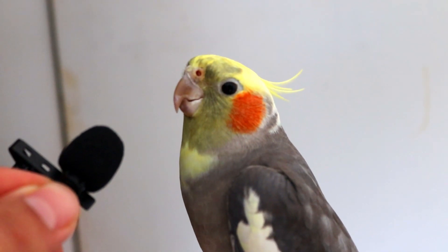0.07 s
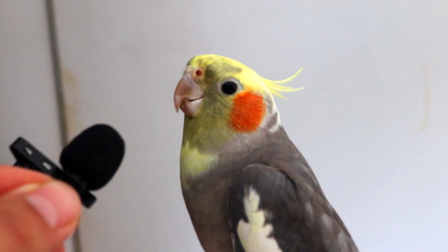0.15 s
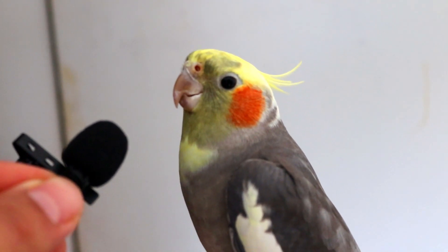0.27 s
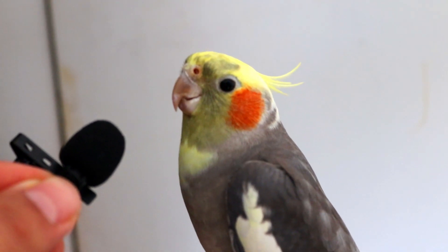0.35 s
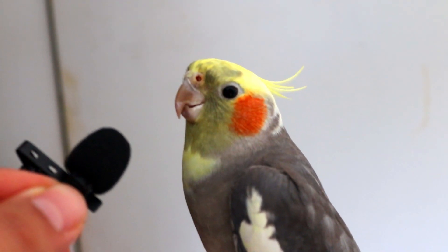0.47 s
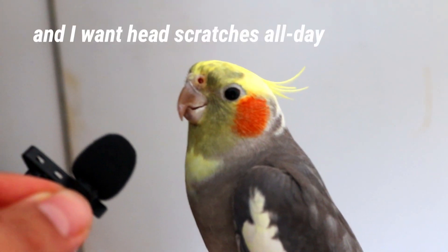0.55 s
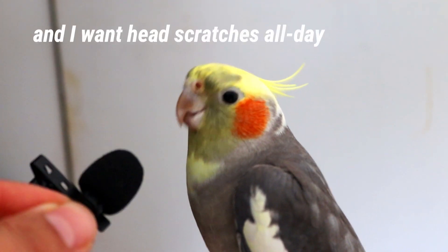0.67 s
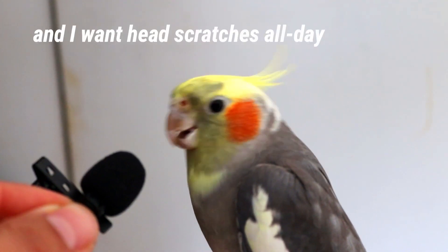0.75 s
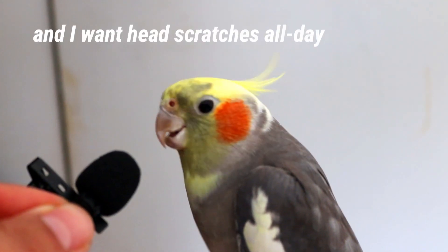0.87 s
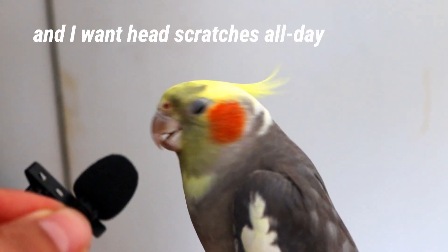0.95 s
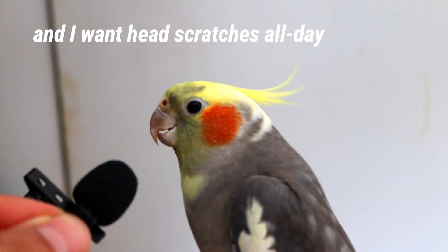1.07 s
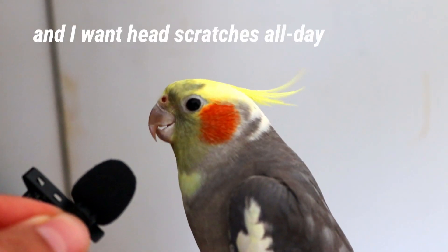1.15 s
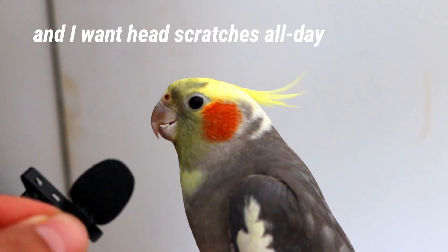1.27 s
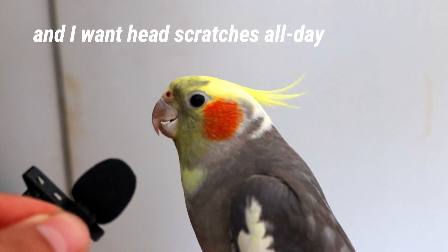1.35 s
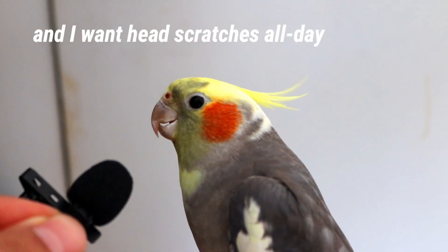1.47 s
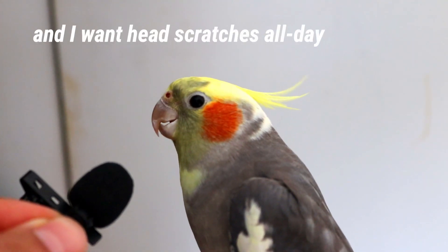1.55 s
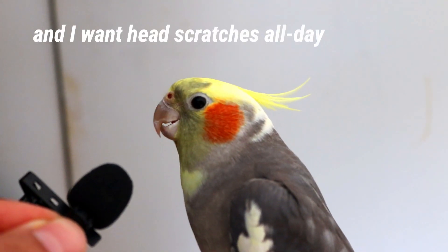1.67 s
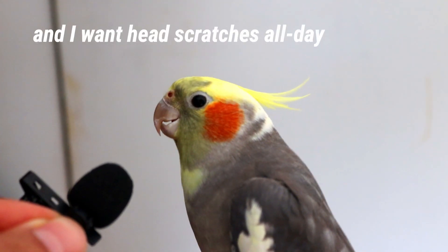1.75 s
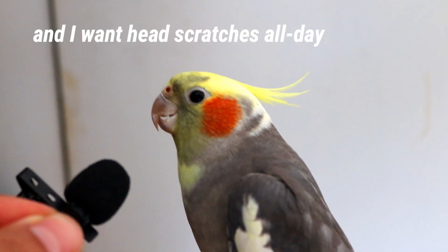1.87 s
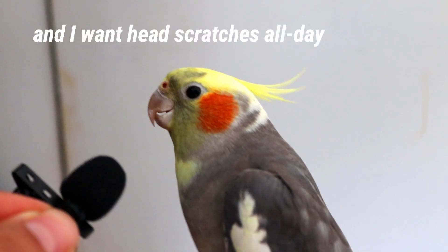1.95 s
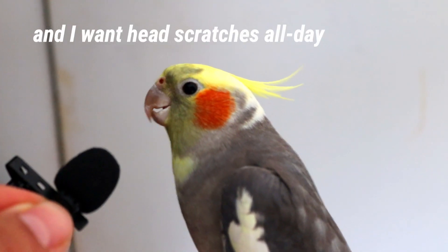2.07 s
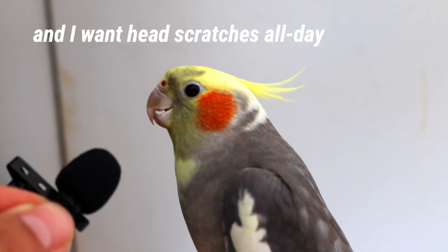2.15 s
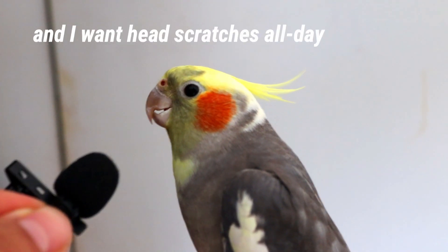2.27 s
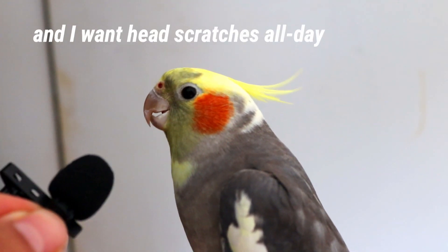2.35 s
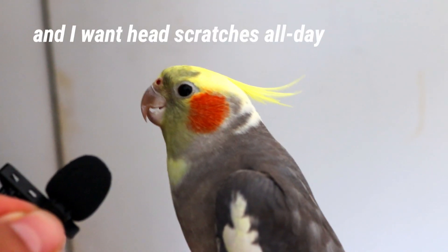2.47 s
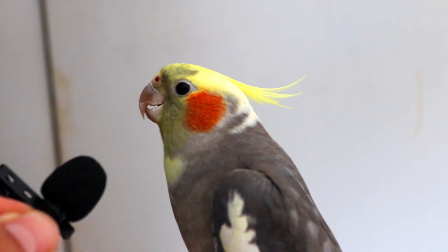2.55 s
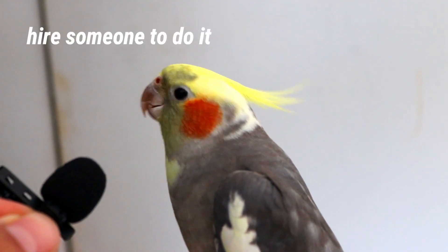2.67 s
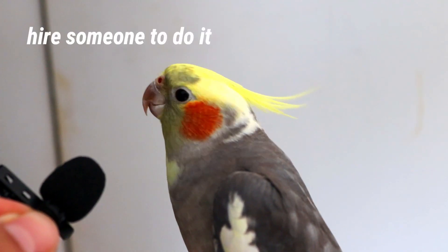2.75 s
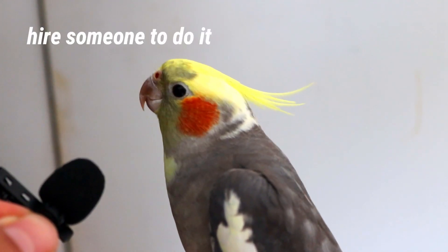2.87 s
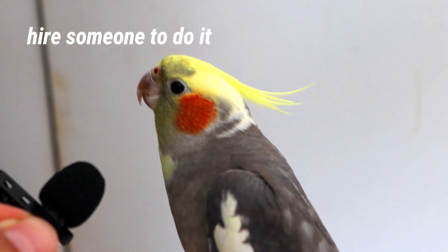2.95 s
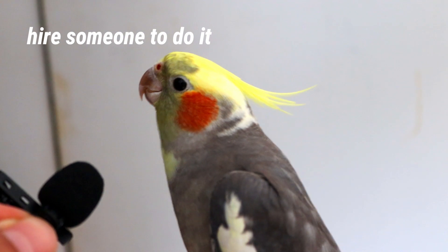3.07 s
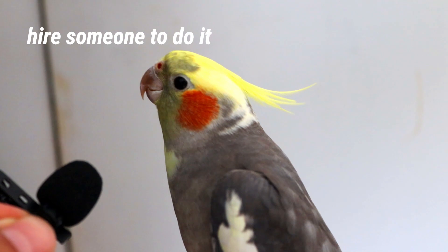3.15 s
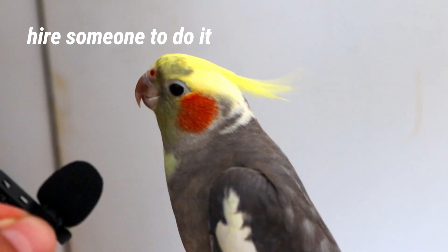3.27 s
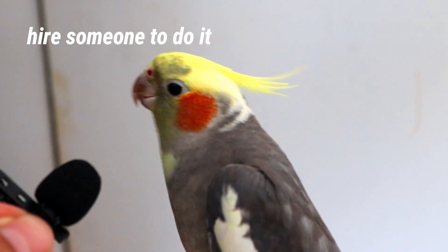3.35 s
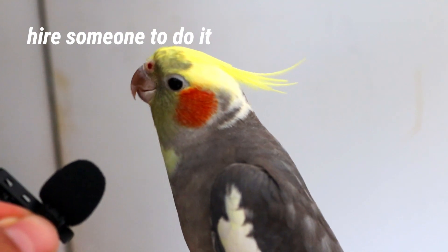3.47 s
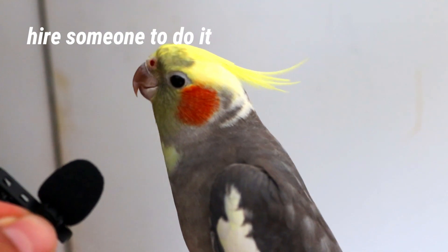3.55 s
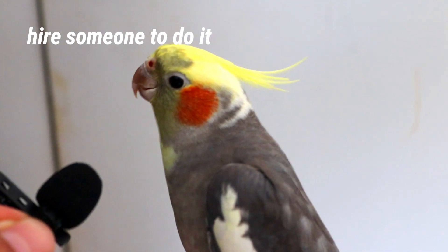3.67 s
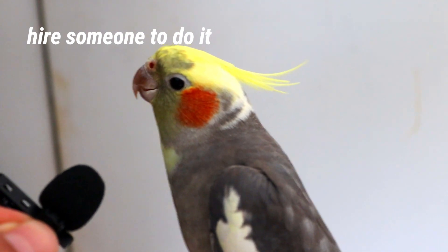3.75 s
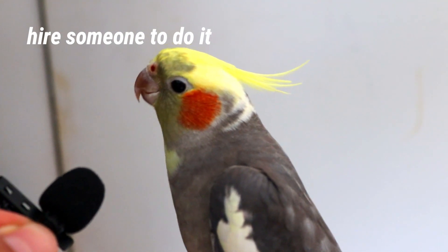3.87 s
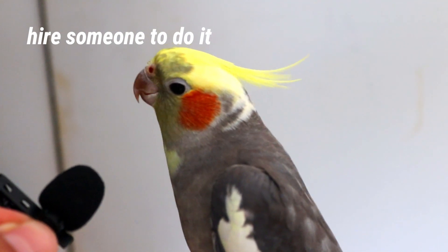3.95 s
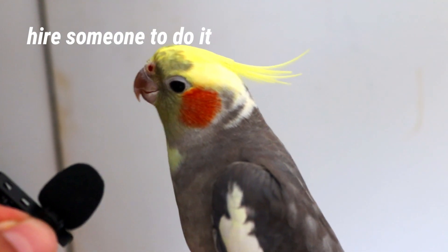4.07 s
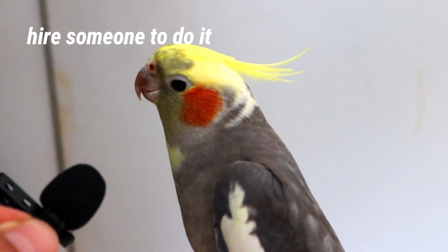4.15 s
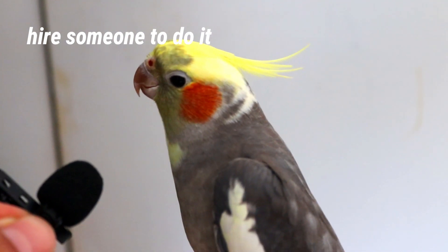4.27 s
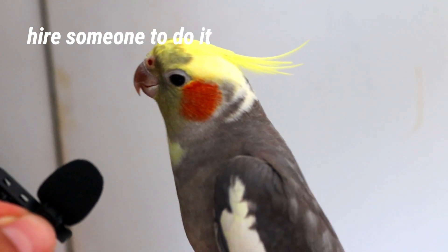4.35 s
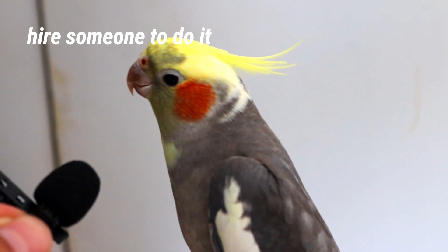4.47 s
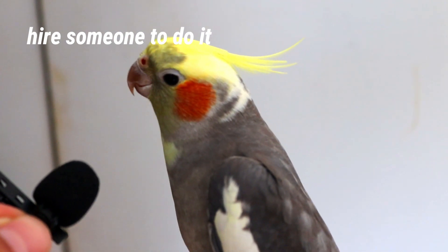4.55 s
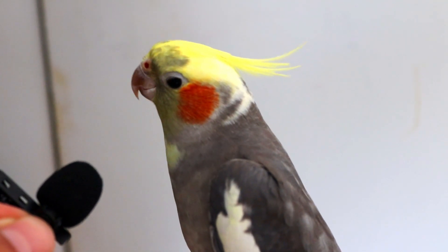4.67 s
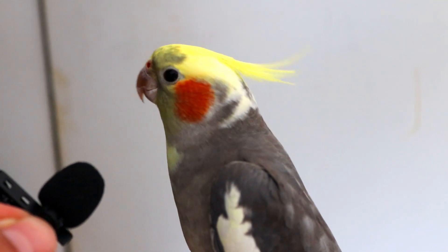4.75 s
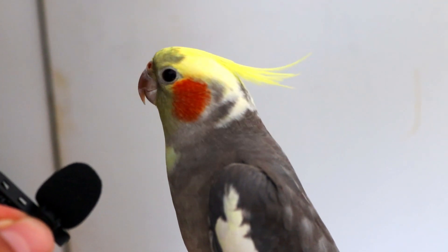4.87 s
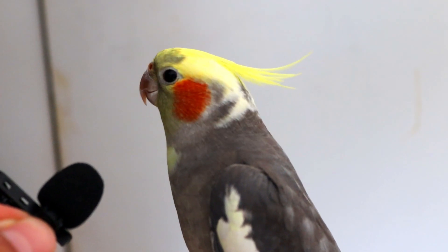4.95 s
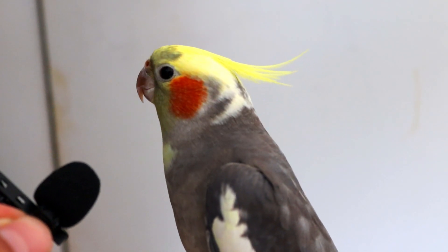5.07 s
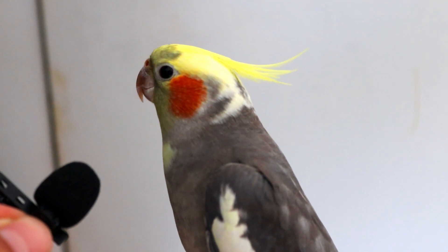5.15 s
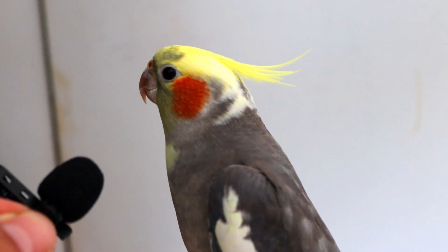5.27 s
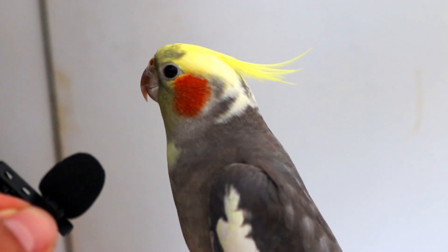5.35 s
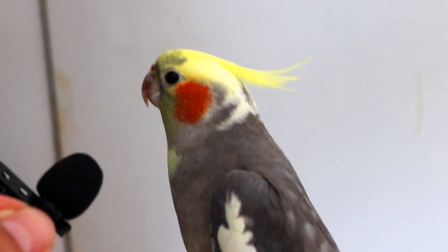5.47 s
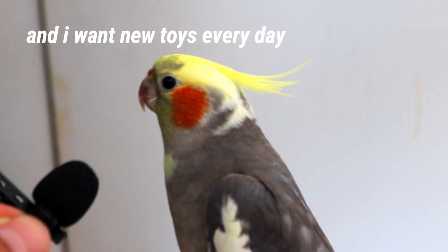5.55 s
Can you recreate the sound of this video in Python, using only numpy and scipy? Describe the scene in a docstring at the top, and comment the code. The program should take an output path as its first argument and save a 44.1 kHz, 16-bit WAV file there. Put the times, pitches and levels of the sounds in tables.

```python
"""A cockatiel sings short whistled notes close to the microphone: harmonics of the syrinx through a throat and beak.
Most notes open with a few clicks and a crackle (pulses ringing throat resonances).
Each note starts rough, locks into a clean whistle and breaks up as it ends.
Farther birds chirp (bent glides) and rasp (shaped noise) in the same echoing room.
Air hiss, rumble and soft bumps are shaped noise; a gain control evens out the loud notes."""
import sys
import numpy as np
from scipy import signal
from scipy.fft import rfft, irfft, next_fast_len
from scipy.io import wavfile
from scipy.ndimage import uniform_filter1d

SR = 44100
rng = np.random.default_rng(int(sys.argv[2]) if len(sys.argv) > 2 else 0)


def master(y):
    """Save y as 16-bit WAV."""
    cut = np.clip(np.atleast_2d(y).T, -1, 1)
    pcm = np.round(cut * 32767)  # scale
    wavfile.write(sys.argv[1], SR, pcm.astype(np.int16))


N = 247401
TIME_S = np.arange(N) / SR
CUTOFF_HZ = 15900

# Near notes; pitch is the syrinx fundamental, its 2nd harmonic is the whistle heard. Levels are before mixing:
# first_snap_s, voice_start_s, end_s, rough_opening_s, lock_pitch_hz, turn_pitch_hz, breakup_pitch_hz,
# turn_place_0_1, whistle_level_db, beak_opening_0_1, odd_harmonics_db, octave_above_whistle_db,
# top_harmonics_db, snap_level_db
NOTES = [(-0.03, -0.02, 0.079, 0.01, 741.0, 755.0, 752.0, 0.8, -14.0, 0.37, 1.0, 2.5, -2.5, -10.0),
         (0.8903, 0.92, 1.024, 0.01, 796.0, 829.0, 818.0, 0.45, -15.0, 0.42, 1.0, 9.0, -1.0, -0.5),
         (1.0762, 1.099, 1.198, 0.024, 795.0, 793.0, 768.0, 0.65, -14.5, 0.6, 1.0, 8.0, -2.0, -2.0),
         (1.2503, 1.275, 1.378, 0.008, 805.0, 794.0, 807.0, 0.7, -13.5, 0.57, 0.5, 10.0, 0.0, -4.5),
         (1.4328, 1.455, 1.56, 0.013, 783.0, 775.0, 774.0, 0.5, -15.0, 0.62, -0.5, 4.5, 3.0, -7.0),
         (1.6143, 1.641, 1.723, 0.011, 885.0, 849.0, 865.0, 0.55, -12.5, 0.95, -3.0, -5.0, 4.0, -5.5),
         (1.7857, 1.81, 1.903, 0.012, 826.0, 785.0, 830.0, 0.35, -14.0, 0.72, -3.5, 5.5, -1.0, -6.0),
         (1.9841, 1.995, 2.103, 0.031, 858.0, 834.0, 863.0, 0.3, -13.5, 0.8, -3.5, 5.0, -3.0, -7.0),
         (2.1555, 2.184, 2.281, 0.01, 872.0, 880.0, 882.0, 0.6, -12.5, 0.9, -2.0, -2.5, 1.5, -4.0),
         (2.3472, 2.372, 2.46, 0.012, 856.0, 870.0, 858.0, 0.2, -14.0, 0.78, -0.0, 5.0, 2.0, -4.5),
         (2.5421, 2.551, 2.794, 0.033, 829.0, 871.0, 802.0, 0.6, -14.0, 0.73, -4.0, 2.0, -3.0, -8.0),
         (3.0612, 3.086, 3.245, 0.01, 789.0, 823.0, 811.0, 0.25, -15.5, 0.29, 1.0, 4.5, -0.5, -5.0),
         (3.488, 3.514, 3.753, 0.012, 768.0, 774.0, 722.0, 0.35, -15.0, 0.2, -2.5, -2.0, -2.5, -5.5),
         (3.8127, 3.836, 3.971, 0.022, 742.0, 706.0, 685.0, 0.8, -16.5, 0.13, -1.0, -4.0, 1.0, -14.0),
         (4.0457, 4.064, 4.184, 0.034, 733.0, 715.0, 719.0, 0.35, -16.0, 0.14, -1.5, -3.5, 5.0, -13.0),
         (4.2663, 4.277, 4.416, 0.026, 695.0, 726.0, 744.0, 0.45, -16.5, 0.12, -0.5, -5.0, 6.5, -20.0),
         (4.5049, 4.516, 4.69, 0.04, 743.0, 729.0, 707.0, 0.8, -17.5, 0.42, -2.0, 4.5, 2.0, -12.0)]
# Uneven strength of the syrinx harmonics: harmonic_number, level_db
SYRINX_HARMONICS = [(5, 2), (6, 2.5), (7, 7), (8, -1.5), (9, 1.5), (10, 4), (11, -0.5)]
# Throat colour, beak nearly shut: frequency_hz, level_db
BEAK_SHUT_COLOUR = [(750, -16), (1400, 4), (1650, 3), (2300, -2.5), (3050, -8), (3750, -37), (4500, -24),
                    (5400, -42), (7500, -40.5), (9200, -53.5), (12300, -42.5), (14600, -31)]
# Throat colour, beak wide open: frequency_hz, level_db
BEAK_OPEN_COLOUR = [(850, -25), (1500, -1.5), (1800, -1), (2600, -9.5), (3450, -14), (4300, -16.5),
                    (5200, -7.5), (6100, -15), (7000, -20), (8600, -29.5), (11600, -39), (15000, -50)]
# Throat resonances rung by a snap: frequency_hz, width_hz, level_db
THROAT_RESONANCES = [(1762, 166, 0), (2960, 230, -7), (4120, 415, -0.5), (6330, 1700, 2), (7800, 370, -9),
                     (12100, 1500, -0.5)]
# Chirps of other birds, levels before mixing:
# start_s, end_s, start_pitch_hz, middle_pitch_hz, end_pitch_hz, level_db, second_harmonic_db, roughness_0_1
FAR_CALLS = [ (0.573, 0.626, 1196, 1199, 1195, -41, -5, 0.31),
             (0.619, 0.717, 1694, 1662, 1586, -41, -21, 0.27),
             (0.78, 0.833, 4330, 4000, 3500, -41, -17.5, 0.76),
             (0.818, .89, 2890, 2710, 2530, -30.5, -31, 0.48),
             (1.31, 1.435, 6120, 6550, 5910, -27.5, -19, 0.22),
             (1.334, 1.424, 5300, 5150, 5170, -34.5, -3, 0.19),
             (1.532, 1.626, 1382, 1309, 1317, -36, 11, 0),
             (2.414, 2.587, 4350, 4200, 4447, -29, -6.5, 0.48),
             (2.975, 3.016, 7200, 7150, 7170, -50, -17, .15), (2.47, 2.557, 6500, 6500, 6395, -42, 6, 0.58),
             (4.423, 4.523, 3600, 3500, 3500, -46, -12, 0.7),
             (4.636, 4.721, 6180, 7150, 7080, -14.5, -14, 0.36),
             (4.704, 4.766, 5970, 5950, 5960, -21.5, -9.5, 0.32),
             (4.682, 4.852, 1896, 2749, 2320, -22, -19, 0.58), (4.71, 4.8, 2802, 2840, 2857, -15, -20, 0),
             (5.163, 5.295, 1110, 1300, 1702, -44, -18, 0.37),
             (5.449, 5.585, 1162, 1250, 1470, -42, -5.5, 0.63)]
# Far hisses and harsh rasps, levels before mixing: start_s, end_s, level_db, treble_tilt_db_per_octave
RASPS = [(0.267, 0.338, -41.5, 5.5), (2.416, 2.6, -27.5, 10), (4.845, 4.935, -18.5, 5.5),
         (5.424, 5.498, -40.5, -5)]
# Rasp spectrum before the tilt: frequency_hz, level_db
RASP_COLOUR = [(800, -21.5), (1600, -4), (2700, 7), (3600, -6), (4400, -0.5), (6300, -1), (7500, -14.5),
               (9000, -14.5), (13000, -31.5), (16000, -41)]
# Soft bumps of the hand on the microphone: centre_s, level_db
BUMPS = [(0.568, -50), (.674, -44.5), (2.585, -48), (3.016, -47)]
# Bump spectrum: frequency_hz, level_db
BUMP_COLOUR = [(40, -30), (110, -10), (200, -6), (330, -8), (600, -27), (2000, -42)]
# Level of the low room rumble: time_s, level_db
RUMBLE_LEVEL = [(0, -59), (1.2, -57), (2.3, -66), (2.7, -57.5), (3.6, -59), (4.55, -58.5), (4.7, -53.5),
                (5.1, -55.5), (5.35, -64), (5.6, -58)]
# Rumble spectrum: frequency_hz, level_db
RUMBLE_COLOUR = [(20, -23), (36, -18), (49, -4.5), (70, -9), (120, -15.5), (300, -24.5), (1000, -51.5)]
# Room hiss spectrum: frequency_hz, level_db
AIR_COLOUR = [(60, -19.5), (220, 0), (500, -0.5), (1500, -7), (3000, -19.5), (7000, -10.5), (16000, -16)]
# Room echo bands: centre_hz, t60_s, level_db
ROOM_BANDS = [(286, 0.9, 0.5), (860, 1, -2.5), (1970, 0.79, 1), (3500, 0.61, 0), (6400, 0.47, -1),
              (14100, .3, -9)]

ATTACK_S, RELEASE_S = 0.0045, 0.019
# The voice locks and breaks up abruptly
LOCK_S, ROUGH_ENDING_S, BREAK_S, ENDING_ROUGHNESS = 0.0033, 0.01795, 0.0035, 0.81
# A note starts sharp and settles, sags as it breaks up, and flicks upwards in its last instant
SETTLE_HZ_PER_S, SAG_HZ_PER_S, FLICK_S, FLICK_HZ_PER_S = 1062, 1800, 0.0062, 3500
# Odd harmonics fade through the note, with a very slight bulge midway; the octave fades; the top grows
ODD_FADE_DB, ODD_ARCH_DB, OCTAVE_FADE_DB, TOP_RISE_DB = 7.5, 0.5, 2.7, 7
# A held note strains: grittier, recoloured, trembling
CLEAN_ROUGHNESS, HELD_ROUGHNESS, STRAIN_AFTER_S, STRAIN_RISE_S = 0.02, 0.078, 0.059, 0.014
STRAIN_OCTAVE_DB, STRAIN_ODD_DB, STRAIN_PITCH_FRACTION = 2, 3.5, 0.0065


def from_db(db):
    """Decibels to gain."""
    return 10 ** (np.asarray(db) / 20)


def rms_one(x):
    """Scale to rms 1."""
    return x / np.sqrt(np.mean(x ** 2) + 1e-20)


def at_hz(points, hz):
    """Read a spectrum on a log-frequency axis."""
    point_hz, value = np.transpose(points)
    return np.interp(np.log(np.maximum(hz, 1)), np.log(point_hz), value)


def ramp(start, end, at=TIME_S):
    """0 before start, 1 after end, straight between."""
    return np.clip((at - start) / max(end - start, 1 / SR), 0, 1)


def filtered(x, order, hz, kind="low"):
    """Butterworth filter."""
    return signal.sosfilt(signal.butter(order, hz, kind, fs=SR, output="sos"), x)


def wobble(rate_hz):
    """Random motion up to about a given rate, rms 1."""
    return rms_one(filtered(rng.standard_normal(N), 2, rate_hz))


def noise(colour):
    """Noise of a given spectrum, rms 1."""
    size = next_fast_len(N)
    gain = from_db(at_hz(colour, np.fft.rfftfreq(size, 1 / SR)))
    return rms_one(irfft(rfft(rng.standard_normal(size)) * gain, size)[:N])


def note_course(t, start_s, end_s, opening_s, lock_hz, turn_hz, breakup_hz, turn):
    """Course of one note: rough until it locks, two clean glides, rough again as the pressure drops."""
    lock_s, break_s = start_s + opening_s, end_s - ROUGH_ENDING_S
    progress = ramp(lock_s, break_s, t)

    pitch_hz = np.interp(progress, [0, turn, 1], [lock_hz, turn_hz, breakup_hz])
    pitch_hz = pitch_hz + SETTLE_HZ_PER_S * np.maximum(lock_s - t, 0)
    pitch_hz = pitch_hz - SAG_HZ_PER_S * np.maximum(t - break_s, 0)
    pitch_hz = pitch_hz + FLICK_HZ_PER_S * np.maximum(t - end_s + FLICK_S, 0)

    gate = ramp(start_s - ATTACK_S / 2, start_s + ATTACK_S / 2, t)
    gate = gate * np.sqrt(1 - ramp(end_s - RELEASE_S, end_s, t))
    gate = gate * (1 - ramp(end_s - RELEASE_S, end_s + RELEASE_S, t))

    rough = 1 - ramp(lock_s - LOCK_S / 2, lock_s + LOCK_S / 2, t)
    rough = rough + ENDING_ROUGHNESS * ramp(break_s - BREAK_S / 2, break_s + BREAK_S / 2, t)
    strain = ramp(start_s + STRAIN_AFTER_S, start_s + STRAIN_AFTER_S + STRAIN_RISE_S, t)
    return progress, pitch_hz, gate, rough, strain


def whistle(jitter_rad=0.19, shimmer=0.2, waver_fraction=0.0038, rough_db=-3.0, rough_odd_db=-5,
            rough_tilt_db_per_octave=-1.0, hiss_db=-57, dispersion_rad=0.33, fray_rad=1.0,
            flicker_db=2.0, top_from_hz=10000, top_full_hz=14000, low_cut_hz=430):
    """Harmonics of the syrinx through a throat whose colour follows the beak opening."""
    drift, tremble, flutter, frayed = wobble(60), wobble(372), wobble(1010), wobble(220)
    flicker = wobble(35)
    hiss = from_db(hiss_db) * noise([(500, -47), (2000, -29.0), (6000, -35), (9500, -8), (15000, -15.0)])
    out = np.zeros(N)
    for (_, start_s, end_s, opening_s, lock_hz, turn_hz, breakup_hz, turn,
         level_db, beak, odd_db, octave_db, top_db, _) in NOTES:
        on = np.flatnonzero((TIME_S > start_s - ATTACK_S) & (TIME_S < end_s))
        progress, pitch_hz, gate, rough, strain = note_course(
            TIME_S[on], start_s, end_s, opening_s, lock_hz, turn_hz, breakup_hz, turn)
        unsteady = rough + CLEAN_ROUGHNESS + HELD_ROUGHNESS * strain
        strain_change = strain - strain.mean()

        bend = waver_fraction * drift[on] + STRAIN_PITCH_FRACTION * strain * flutter[on]
        phase = 2 * np.pi * np.cumsum(pitch_hz * (1 + bend)) / SR
        phase = phase + jitter_rad * unsteady * tremble[on]

        # strong and weak beats alternate, which gives the odd harmonics
        odd = odd_db - ODD_FADE_DB * (progress - 0.5)
        odd = odd + ODD_ARCH_DB * (np.sin(np.pi * progress) - 0.5)
        odd = odd + rough_odd_db * rough + STRAIN_ODD_DB * strain_change
        octave = octave_db - OCTAVE_FADE_DB * (progress - 0.5) + STRAIN_OCTAVE_DB * strain_change
        top = top_db + TOP_RISE_DB * progress

        tone = 0
        for k in range(1, 23):
            hz = k * pitch_hz
            own = (on + rng.integers(N)) % N   # each harmonic wavers in its own way
            colour_db = (1 - beak) * at_hz(BEAK_SHUT_COLOUR, hz) + beak * at_hz(BEAK_OPEN_COLOUR, hz)
            colour_db = colour_db + top * ramp(top_from_hz, top_full_hz, hz)
            # a rough voice is duller
            colour_db = colour_db + rough_tilt_db_per_octave * rough * max(np.log2(k / 2), 0)

            source_db = at_hz(SYRINX_HARMONICS, k) + (k % 2) * odd + (k == 4) * octave
            source_db = source_db + (k != 2) * flicker_db * flicker[own]

            # throat delay smears the pulse; the highest harmonics fray into narrow bands of noise
            lag = dispersion_rad * k ** 2 + fray_rad * (hz / CUTOFF_HZ) ** 2 * frayed[own]
            tone = tone - from_db(colour_db + source_db) * (hz < CUTOFF_HZ) * np.cos(k * phase - lag)

        tone = tone * from_db(rough_db * rough) * (1 + shimmer * unsteady * flutter[on])
        breath = hiss[on] * (1 + np.cos(phase))   # pulses at the syrinx pitch
        out[on] += from_db(level_db) * gate * (tone + breath)
    return filtered(out, 3, low_cut_hz, "high")


def room_air(level_db=-62):
    """Steady room hiss: shaped noise."""
    return from_db(level_db) * noise(AIR_COLOUR)


def room_rumble():
    """Low rumble of the room: shaped noise on a slow level curve."""
    time_s, level_db = np.transpose(RUMBLE_LEVEL)
    return from_db(np.interp(TIME_S, time_s, level_db)) * noise(RUMBLE_COLOUR)


def room_echo(x, gap_s=0.0023):
    """Diffuse echo: bands of decaying noise, the higher ones mostly dying sooner."""
    t, impulse = TIME_S[:SR], 0
    centres_hz = np.array(ROOM_BANDS)[:, 0]
    edges_hz = [centres_hz[0] / 2, *np.sqrt(centres_hz[1:] * centres_hz[:-1]), CUTOFF_HZ]
    for (_, t60_s, level_db), low_hz, high_hz in zip(ROOM_BANDS, edges_hz, edges_hz[1:]):
        decay = from_db(-60 * t / t60_s) * (t > gap_s)
        band = filtered(rng.standard_normal(SR), 2, [low_hz, high_hz], "band")
        impulse = impulse + from_db(level_db) * band * decay / np.sqrt(np.sum(decay ** 2))
    return signal.fftconvolve(x, impulse)[:N]


def far_rasps(fade_in_s=0.022, fade_out_s=0.011):
    """Hisses and harsh rasps: bursts of tilted noise."""
    out = np.zeros(N)
    for start_s, end_s, level_db, tilt_db in RASPS:
        colour = [(hz, db + tilt_db * np.log2(hz)) for hz, db in RASP_COLOUR]
        gate = ramp(start_s, start_s + fade_in_s) * (1 - ramp(end_s - fade_out_s, end_s))
        out += from_db(level_db) * noise(colour) * gate
    return out


def hand_bumps(width_s=0.012):
    """Hand on the microphone: bell-shaped swells of low noise."""
    swell = sum(from_db(level_db) * np.exp(-((TIME_S - s) / width_s) ** 2) for s, level_db in BUMPS)
    return swell * noise(BUMP_COLOUR)


def far_chirps(rough_pitch_fraction=0.1052, edge_s=0.011):
    """Two harmonics on a bent glide, blurred by an unsteady pitch."""
    out = np.zeros(N)
    flutter = wobble(378)
    for start_s, end_s, first_hz, middle_hz, last_hz, level_db, second_db, rough in FAR_CALLS:
        on = (TIME_S > start_s) & (TIME_S < end_s)
        t = TIME_S[on]
        hz = np.interp(t, [start_s, (start_s + end_s) / 2, end_s], [first_hz, middle_hz, last_hz])
        phase = 2 * np.pi * np.cumsum(hz * (1 + rough_pitch_fraction * rough * flutter[on])) / SR
        swell = np.minimum(np.minimum(t - start_s, end_s - t) / edge_s, 1)
        tone = np.sin(phase) + from_db(second_db) * np.sin(2 * phase)
        out[on] += from_db(level_db) * np.sqrt(2) * swell * tone
    return out


def crackle(beats_per_s=380, flutter_db=-9.5, spread_db=2.0, snap_db=-5.5, snap_gap_s=0.009,
            snap_loss_db=4, snap_count=3, pause_s=0.0014, low_hz=550, high_hz=8600,
            soft_hz=8000, mellow_hz=4000, shut_dull_db_per_octave=4):
    """The syrinx snaps, then flutters unevenly; pulses ring the throat, duller when the beak is shut."""
    pulses, flutter, shut = np.zeros((3, N))
    uneven_rate = beats_per_s * np.exp(wobble(300) / 2)
    beats = np.diff(np.floor(np.cumsum(uneven_rate) / SR), prepend=0)
    beats = beats * from_db(flutter_db + spread_db * np.clip(rng.standard_normal(N), -2, 2))
    for first_s, start_s, *_, beak, _, _, _, level_db in NOTES:
        gate = ramp(first_s + pause_s, start_s - pause_s) * (1 - ramp(start_s, start_s + 2 * pause_s))
        flutter += from_db(level_db) * beats * gate
        shut[TIME_S >= first_s - pause_s] = 1 - beak
        for k in range(snap_count):   # evenly spaced, each weaker
            snap_s = first_s + k * snap_gap_s
            if 0 < snap_s < start_s:
                train = pulses if k == 0 else flutter
                train[round(snap_s * SR)] += from_db(level_db + snap_db - snap_loss_db * k)

    # only the first snap is really hard
    pulses += filtered(filtered(flutter, 1, mellow_hz), 6, soft_hz)

    out = np.zeros(N)
    for k, (hz, width_hz, level_db) in enumerate(THROAT_RESONANCES):
        radius, angle = np.exp(-np.pi * width_hz / SR), 2 * np.pi * hz / SR
        octaves = np.log2(hz / THROAT_RESONANCES[1][0])
        gain_db = level_db - shut_dull_db_per_octave * shut * octaves + wobble(53)
        struck = pulses * from_db(gain_db) + 1e-18
        ringing = signal.lfilter([0.5, 0, -0.5], [1, -2 * radius * np.cos(angle), radius ** 2], struck)
        out += (-1) ** k * ringing
    return filtered(out, 3, [low_hz, high_hz], "band")


def gain_control(x, threshold_db=-15, share=0.64, attack_s=0.0018, release_db_per_s=91, window=128):
    """Gain that turns loud sound down fast and recovers slowly: notes more level, room ducked under them."""
    level_db = 10 * np.log10(np.maximum(uniform_filter1d(x ** 2, window), 1e-12))
    over_db = share * np.maximum(level_db - threshold_db, 0)
    release_db = release_db_per_s * TIME_S
    held_db = np.maximum.accumulate(over_db + release_db) - release_db
    r = np.exp(-1 / (attack_s * SR))
    smooth_db, _ = signal.lfilter([1 - r], [1, -r], held_db, zi=[held_db[window]])
    return from_db(-smooth_db)


def scene(whistle_db=6, near_room_db=-21, near_room_hz=4500, far_direct_db=-6, far_room_db=-0.74, blur=0.31):
    """Near bird almost dry, the others mostly echo; one microphone feeds both channels."""
    near = from_db(whistle_db) * whistle() + crackle()
    far = far_rasps() + far_chirps()
    # in the echo a soft wash surrounds each tone
    near_echo = filtered(room_echo(near * (1 + blur * wobble(413))), 2, near_room_hz)

    mono = near + from_db(near_room_db) * near_echo
    mono = mono + from_db(far_direct_db) * far + from_db(far_room_db) * room_echo(far)
    mono = mono + room_air() + room_rumble() + hand_bumps()
    return np.array([mono, mono])


def record(dry, noise_db=-70):
    """Gain control, faint independent shaped noise in each channel, then a steep treble cut."""
    noise_colour = [(50, -12.0), (400, -24), (15000, -30.0)]
    channel_noise = from_db(noise_db) * np.array([noise(noise_colour) for channel in dry])
    steep_cut = signal.ellip(10, 0.1, 80, CUTOFF_HZ, fs=SR, output="sos")
    return signal.sosfilt(steep_cut, dry * gain_control(dry[0]) + channel_noise)


dry = scene()
out = record(dry)
master(out)
```